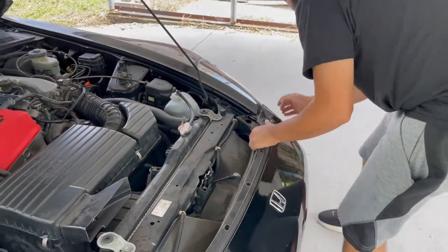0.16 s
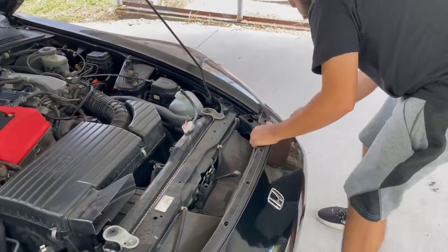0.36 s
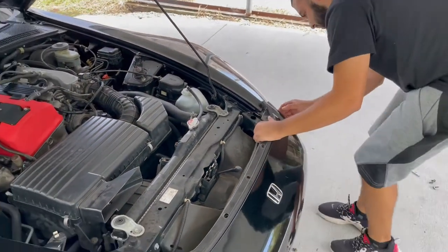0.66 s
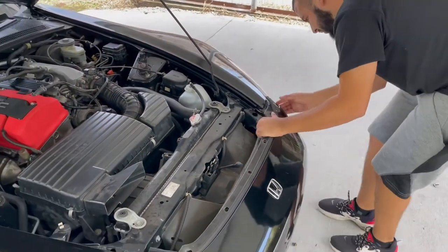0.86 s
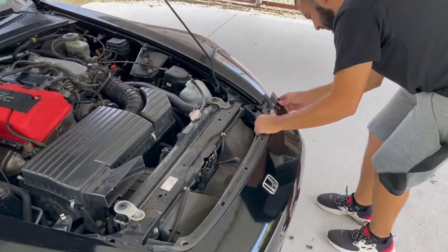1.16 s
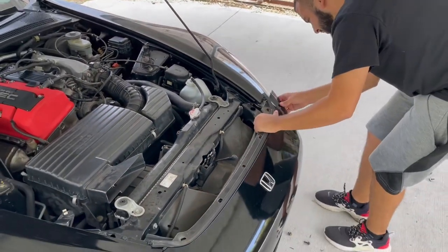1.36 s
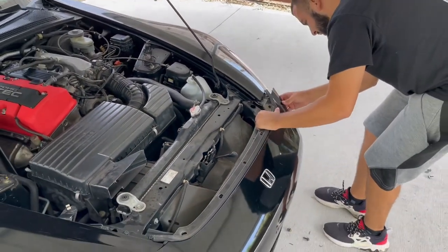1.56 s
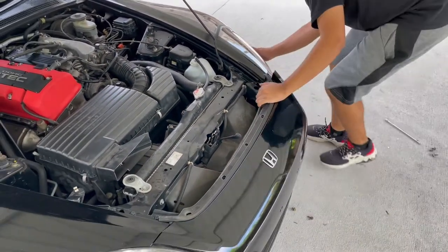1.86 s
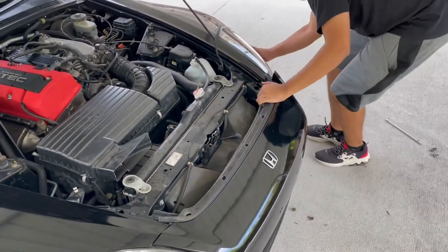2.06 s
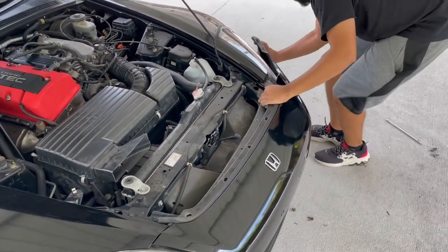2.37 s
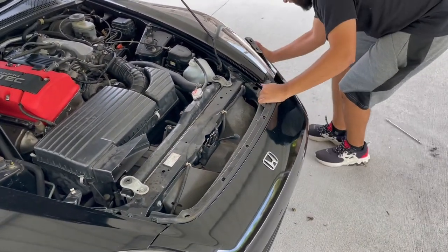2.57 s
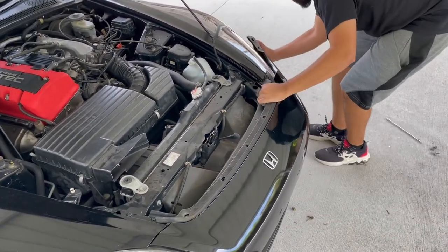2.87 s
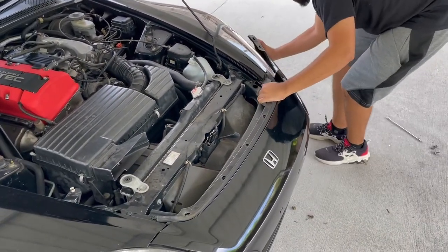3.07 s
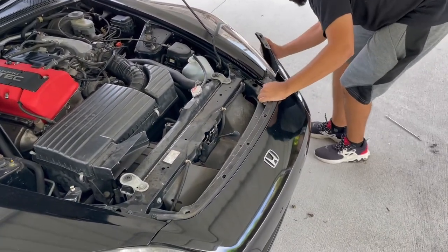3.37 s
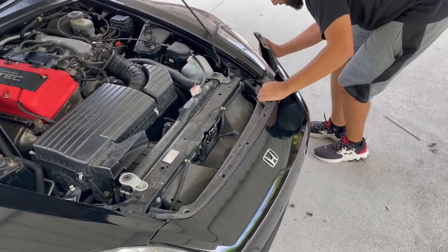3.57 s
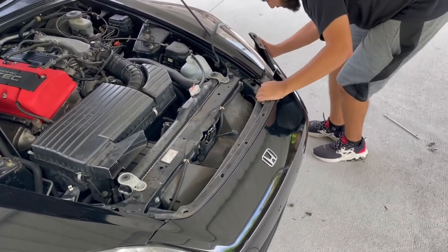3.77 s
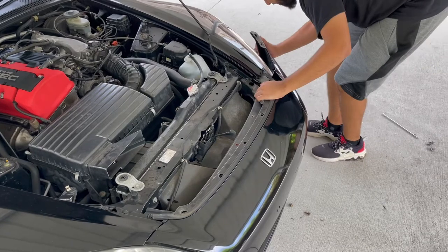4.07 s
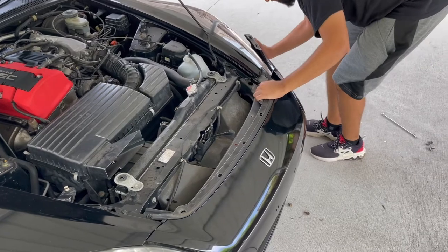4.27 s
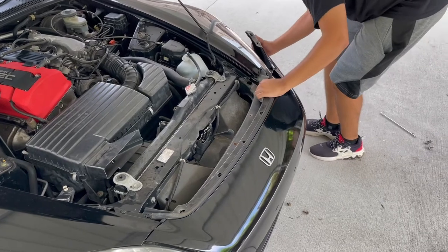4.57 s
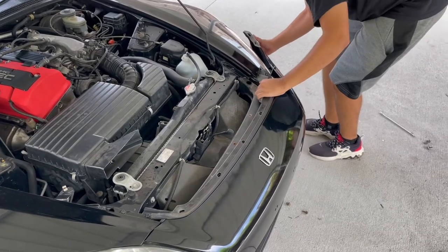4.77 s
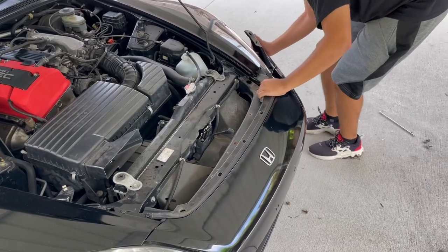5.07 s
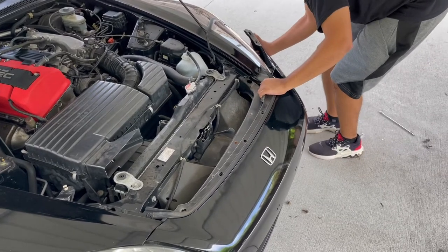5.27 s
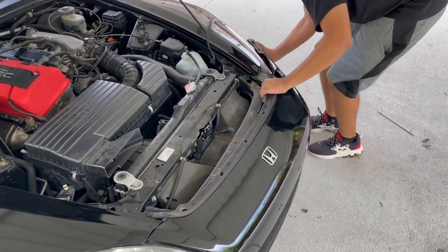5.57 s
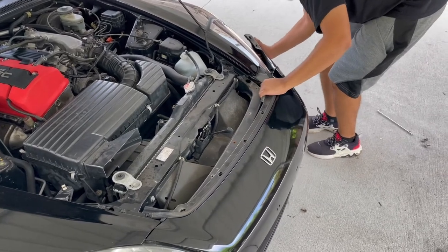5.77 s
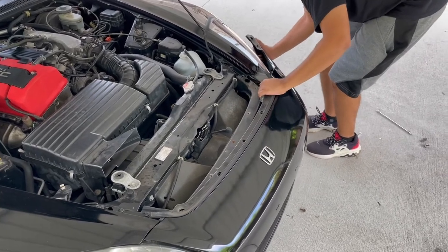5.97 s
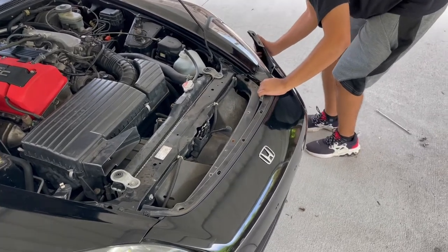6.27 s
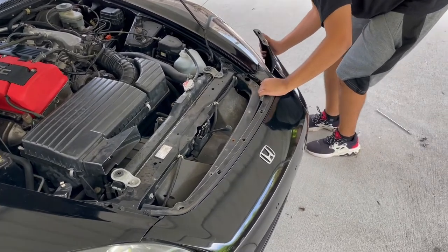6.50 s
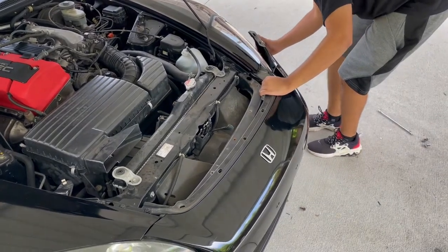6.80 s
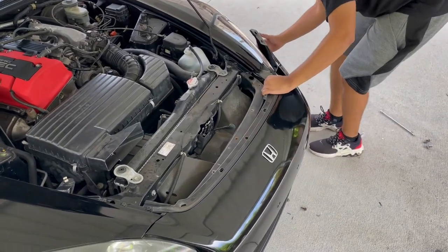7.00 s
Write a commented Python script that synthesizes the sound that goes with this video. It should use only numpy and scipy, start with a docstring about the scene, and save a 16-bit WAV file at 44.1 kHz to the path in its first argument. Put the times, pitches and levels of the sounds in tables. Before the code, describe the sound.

Plastic tabs break free from a car front: knocking at one second, hardest just before two, dull snaps soon after. A hollow housing knock follows, then a quieter stretch with small clicks and faint hand rubbing. Around five and a half seconds the panel pops and slaps again. Distant engines hum beneath. Close microphone, concrete floor, short garage tail.

```python
"""The mouth of a garage: close by, a plastic bumper cover is pulled off a car by hand.
Tabs snap out of their clips, struck as short resonances; the panel answers with noise bands and ringing modes.
Edges tick and scrape, clips click, the panel slaps, a housing knocks hollow, a metal fitting squeaks.
Hands rub and slide as shaped noise. The floor sends blows back and the garage adds a short tail.
Outside, far off: filtered noise for traffic, gliding tones for engines, and a bird of a few harmonics."""
import sys
import numpy as np
from scipy import signal
from scipy.io import wavfile

SR = 44100
rng = np.random.default_rng(int(sys.argv[2]) if len(sys.argv) > 2 else 0)


def transcribe(signal):
    """Save signal, clipped to [-1, 1], as a 16-bit WAV file at the path in sys.argv[1]."""
    frames = np.atleast_2d(signal).T
    limited = np.clip(frames, -1, 1)
    pcm = np.round(limited * 32767).astype(np.int16)
    wavfile.write(sys.argv[1], SR, pcm)


N = 314874
TIME = np.arange(N) / SR
BAND_EDGES_HZ = 22 * 2 ** np.arange(0, 9.7, .4)

# tabs letting go; heft is how much the whole panel moves, sharpness how hard the tab cracks:
# start_s, strength_db, heft_db, sharpness_db, tab_ring_db, tab_pitch_hz
SNAPS = [(1.0201, -15.5, 3, -7, -22, 1784), (1.038, -17.5, 5, -8, -30.5, 1690),
         (1.9489, -9.5, 0, 5.5, -17.5, 1780), (2.336, -12.5, 2, -21, -37, 1750),
         (2.355, -11.5, -3, -12.5, -30, 1750), (2.4218, -26, -10, 6.5, -35, 1864),
         (5.5016, -23.5, 9.5, -4, -35, 1720), (5.529, -22.5, 3.5, -28, -28, 1780),
         (5.696, -20.5, -0.5, -14, -44, 1750)]
# ringing of a tab: multiple_of_pitch, level_db, t60_s
TAB_MODES = [(1, -1.5, 0.031), (1.32, -11, 0.027), (1.609, -5, 0.032), (1.97, -8, 0.042),
             (3.88, -9.5, 0.025)]
# the loose panel slaps the body, each time with another patch: start_s, level_db, pitch_hz
SLAPS = [(1.024, -15, 365), (1.955, -8.5, 496), (1.9718, -10, 225), (5.503, -22, 427), (5.527, -10.5, 600)]
# the freed panel bumps on its mounts: start_s, level_db
BUMPS = [(1.683, -21), (2.056, -14.5), (2.107, -17), (2.231, -22), (2.292, -17.5)]
# light contacts of the edges: start_s, strength_db, brightness_db_per_octave
TICKS = [(0.5563, -50.5, 2.5), (0.694, -51, 5), (0.959, -41.5, -2), (1.226, -45, -7), (2.4483, -34.5, -7),
         (2.603, -39, -5.5), (2.755, -40, -5.5), (2.836, -43.5, -10), (3.021, -45.5, -8), (4.209, -45, -1),
         (5.693, -41.5, -6)]
# an edge scrapes over its catch: start_s, strength_db, brightness_db_per_octave
SCRAPES = [(1.014, -33, -1), (2.336, -30, -5.5), (2.425, -38.5, -5.5), (5.522, -31.5, -3.5),
           (5.9, -60.5, 5)]
# small clips click open: start_s, strength_db, brightness_db_per_octave, ring_db, ring_pitch_hz
CLICKS = [(0.1742, -46, -6, -52, 3210), (1.4664, -47, 2, -46.5, 3390), (3.3424, -35, -4, -40, 2017),
          (4.2331, -32, -4.5, -38, 2030)]
# the dry crack of a clip: pitch_hz, level_db, t60_s
CLIP_CRACK = [(1120, 2.5, 0.016), (2870, 0, 0.0062), (4470, 7, 0.0059), (13500, 12.5, 0.0064)]
# hollow knocks on the lamp housing: start_s, level_db
HOLLOW_KNOCKS = [(2.802, -19), (4.175, -39), (5.504, -23.5), (5.694, -24)]
# modes of the lamp housing: pitch_hz, level_db, t60_s
HOUSING_MODES = [(830, -1, 0.049), (983, -0.5, 0.045), (1218, 1, 0.027), (1430, -9.5, 0.051),
                 (1555, -3, 0.016)]
# a metal fitting squeaks twice: start_s, length_s, level_db, brightness_db_per_octave
SQUEAKS = [(5.695, 0.1, -51.5, -10), (5.873, 0.19, -62, 5.5)]
# partials of the squeak: pitch_hz, level_db, waver_share_of_pitch
METAL_PARTIALS = [(5255, 0, .004), (7550, -2, .003), (13280, 0, .02)]

# ringing of the panel and the car's front: pitch_hz, level_db, t60_s
PANEL_MODES = [(132.7, -6, 0.48), (224.7, 0, 0.24), (359.4, -8.5, 0.57), (466, 0, 0.096), (562, -8, 0.2),
               (832, -12, 0.3), (989, 1.5, 0.16), (1280, -6.5, 0.33), (1434, -8, 0.26), (1620, -11, 0.47),
               (1820, -9.5, 0.31), (2020, -9, 0.42), (2530, -9, 0.44), (3135, -21, 0.4), (3520, -12, 0.45)]
# colour of a blow on top of its own levels: frequency_hz, level_db
BLOW_COLOUR = [(40, -33), (70, -1.5), (125, 1), (220, -1), (310, -5), (500, -6.5), (760, -5), (1150, -4.5),
               (2500, -2.5), (3300, -6.5), (4700, -1), (6600, -6.5), (8500, 0.5), (11000, -3.5),
               (14000, 0.5)]
# dying of the panel's crowded modes, before each contact's damping: frequency_hz, t60_s
PANEL_T60 = [(100, 0.11), (400, 0.097), (1500, 0.11), (5000, 0.2), (14000, 0.1)]
# dying of the garage: frequency_hz, t60_s
GARAGE_T60 = [(100, 0.34), (500, 0.73), (1500, 0.58), (3000, 0.53), (5000, 0.32), (14000, 0.34)]
# left-right likeness of blows close by: frequency_hz, correlation
BLOW_LIKENESS = [(200, 1), (380, 0.79), (1300, 0.76), (2400, -0.31), (4400, 0.55), (6500, -0.67),
                 (8500, -0.97), (12000, 0.97)]

# hands slide over the plastic: middle_s, half_length_s, level_db, swish_centre_hz
SLIDES = [(2.25, 0.46, -52.5, 2000), (5.118, 0.14, -47.5, 1820), (5.416, 0.11, -45.5, 2390),
          (6.125, 0.18, -45.5, 2500), (7.1, 0.54, -51.5, 1530)]
# colour of the rubbing: frequency_hz, relative_db_per_hz
RUB_COLOUR = [(1100, 1.5), (1700, -0.5), (2800, -5), (4000, -12), (6500, -16.5), (10000, -35)]
# colour of the fine rustle: frequency_hz, relative_db_per_hz
RUSTLE_COLOUR = [(7500, 7.5), (10500, -7.5), (13800, -12), (16000, -8)]
# level of the street's rumble: time_s, level_db
TRAFFIC = [(0.0, -27), (0.59, -44), (1.05, -41), (1.17, -38.5), (2.07, -26), (3.74, -30), (6.66, -26.5),
           (7.14, -26.5)]
# colour of the rumble: frequency_hz, relative_db_per_hz
RUMBLE_COLOUR = [(20, -46), (40, -10), (62, 6), (100, -0.5), (135, -4.5), (170, -10), (260, -19),
                 (450, -24)]
# colour of the road wash: frequency_hz, relative_db_per_hz
WASH_COLOUR = [(170, -2.5), (300, -5.5), (560, -9.5), (1000, -7), (1600, -20), (3200, -32)]
# left-right likeness of the background: frequency_hz, correlation
AIR_LIKENESS = [(110, 0.95), (380, 0.68), (1300, -0.069), (6000, 0.32), (8300, -1.01), (11500, 1)]
# engines of far vehicles swell and fade: start_s, end_s, first_hz, last_hz, level_db
ENGINES = [(0.94, 1.78, 85, 84, -33.5), (2.599, 3.85, 178.9, 185.2, -39), (2.8, 4.332, 92.1, 89, -36.5),
           (4.206, 4.72, 224.6, 211, -43.5), (2.99, 4.102, 225, 226.4, -40),
           (4.9, 5.426, 185.6, 210, -39.5), (5.405, 6.406, 81.8, 83, -31.5),
           (6.002, 6.412, 133, 134.8, -30), (6.39, 7.63, 123, 123.4, -27)]
# how well an engine's overtones carry: frequency_hz, level_re_note_db
OVERTONES = [(300, -32), (440, -18.5), (560, -12.5)]
# a far bird repeats one arched note: start_s, length_s
BIRD_NOTES = [(0.03, 0.12), (0.195, 0.092), (0.29, 0.15), (0.406, 0.11), (0.553, 0.116), (0.7, 0.1)]
# overall gain, with one brief dip; the end values hold outside it: time_s, gain_db
LEVEL_DIP = [(.515, 1.5), (.521, -10), (.529, -10), (.536, 2)]

SNAP_ATTACK_S = .0004   # shortest time that a snap takes to spread through the panel
MODE_SCATTER_DB = 2.5   # how much a mode's strength varies from snap to snap
RATTLE_DB, RATTLE_PER_S = 2.5, 110   # loose parts rattle unevenly in each band
TICK_PIVOT_HZ = 4020   # brightness tilts a tick about this frequency
FLOOR_ECHO_S, FLOOR_ECHO_DB = .00546, -17.5
GRIP_DB, RUSTLE_DB = -51, -63   # rubbing of a resting grip, and the fine rustle at that grip
RUSTLE_FOLLOWS = 0.4   # share of a slide's swell in dB that the rustle follows
WASH_DB, WASH_RISE_DB_PER_S = -44, 0.9731   # level at the start; it rises as traffic draws nearer
BIRD_DB = -62
CUTOFF_HZ = 15700


def from_db(db):
    """Amplitude factor of a level in dB."""
    return 10 ** (np.asarray(db) / 20)


def rms_one(x):
    """Scales a signal to rms 1."""
    return x / np.sqrt(np.mean(x ** 2) + 1e-20)


def in_time(rows):
    """Each column of a curve at every sample."""
    s, *columns = np.transpose(rows)
    return [np.interp(TIME, s, column) for column in columns]


def at_hz(points, hz):
    """Reads a table on a log-frequency axis."""
    f, value = np.transpose(points)
    return np.interp(np.log(hz), np.log(f), value)


def dying(t, t60):
    """Exponential decay that falls 60 dB in t60 seconds."""
    return np.exp(-np.log(1000) * t / t60)


def add(track, s, sound):
    """Mixes a sound into a track at time s."""
    start = max(round(s * SR), 0)
    track[..., start:start + sound.shape[-1]] += sound[..., :N - start]


def drift(rate):
    """Smooth chance from knots of spread 1, changing about rate times a second."""
    knots = rng.standard_normal(size=4096)
    return np.interp(TIME * rate, np.arange(len(knots)), knots)


def ring(force, hz, t60):
    """A two-pole resonance: a unit click sets a dying sine of starting height 1 ringing."""
    r, w = dying(1 / SR, t60), 2 * np.pi * hz / SR
    return signal.lfilter([0, np.sin(w)], [1, -2 * r * np.cos(w), r * r], force + 1e-18)


def tap(tail_db=-31.0, tail_t60=0.4):
    """The force of one sharp contact, followed by scattered reflections."""
    force = from_db(tail_db) * rng.standard_normal(SR) * dying(TIME[:SR], tail_t60)
    force[0] = 1
    return force


def noise_bands(likeness):
    """Yields (centre Hz, stereo noise of rms 1) band by band, with a set left-right correlation."""
    white = rng.standard_normal((2, 2, N))
    for k, (low, high) in enumerate(zip(BAND_EDGES_HZ, BAND_EDGES_HZ[1:])):
        band = signal.butter(2, [low, high], "band", fs=SR, output="sos")
        mid, side = signal.sosfilt(band, white[k % 2])
        hz = np.sqrt(low * high)
        alike = np.clip(at_hz(likeness, hz), -.99, .99)
        stereo = np.sqrt(1 + alike) * mid + np.sqrt(1 - alike) * side * [[1], [-1]]
        yield hz, rms_one(stereo)


def snap_level(snap, hz, crack_db=-9.0, edge_db=-5.0, fizz_db=-47.5,
               hollow_db=0.03, hollow_per_sharpness=0.31):
    """How hard a snap drives the panel at one frequency: heft feeds the bass, a blunt snap knocks more."""
    s, strength, heft, sharpness, *_ = snap
    hollow = hollow_db - hollow_per_sharpness * sharpness   # knock gained at the cost of clack
    spectrum = [
        (160, strength + heft),
        (470, strength + hollow),
        (1350, strength - hollow),
        (1900, strength - hollow + edge_db),
        (3000, strength + sharpness + crack_db),
        (12000, fizz_db),   # the same for every snap
    ]
    return at_hz(spectrum, hz)


def tick_level(tick, hz, lowest_hz=1400, rolloff_db=2.0):
    """A tick's spectrum is a straight slope that falls away below the edge's lowest resonance."""
    s, strength, brightness = tick
    tilt = brightness * np.log2(max(hz, lowest_hz) / TICK_PIVOT_HZ)
    return strength + tilt - rolloff_db * max(np.log2(lowest_hz / hz), 0)


def blow_power(hz, level_db, damping, room_db, build_s=SNAP_ATTACK_S, swell_cycles=2.1, room_onset_s=0.014):
    """Power of one band after a blow: long bending waves swell late, the panel dies fast, the garage slowly."""
    t = TIME[:SR * 3 // 4]
    swell = 1 - np.exp(-t / (build_s + swell_cycles / hz))
    panel = dying(t, at_hz(PANEL_T60, hz) / damping)
    room = from_db(room_db) * (1 - np.exp(-t / room_onset_s)) * dying(t, at_hz(GARAGE_T60, hz))
    return (from_db(level_db) * swell) ** 2 * (panel ** 2 + room ** 2)


def clatter(snap_db=-3.5, tick_db=-4.0, click_db=-4.0):
    """Snaps and light contacts excite the panel's crowded modes, too dense to be heard one by one."""
    out = np.zeros((2, N))
    chatter = from_db(2.2 * drift(500))   # loose edges buzz against each other
    for hz, modes in noise_bands(BLOW_LIKENESS):
        power = np.zeros(N)
        for snap in SNAPS:
            level = snap_level(snap, hz) + snap_db
            add(power, snap[0], blow_power(hz, level, damping=0.71, room_db=-9.5))
        if hz > 500:   # light contacts are too weak to move the whole panel
            for tick in TICKS:
                level = tick_level(tick, hz) + tick_db
                add(power, tick[0], blow_power(hz, level, damping=0.93, room_db=-9.0))
            for *click, _, _ in CLICKS:
                level = tick_level(click, hz) + click_db
                add(power, click[0], blow_power(hz, level, damping=1.17, room_db=-13.5))
            for scrape in SCRAPES:
                level = tick_level(scrape, hz)
                add(power, scrape[0], blow_power(hz, level, damping=0.68, room_db=-8.0, build_s=0.001))
            modes = modes * chatter * from_db(RATTLE_DB * drift(RATTLE_PER_S))
        out += from_db(at_hz(BLOW_COLOUR, hz)) * np.sqrt(power) * modes
    return out


def cracks(snap_db=-11.5, fizz_db=13.0):
    """The plastic around a released tab knocks in short resonances; a light contact starts with a fine tick."""
    snaps, ticks = np.zeros((2, N))
    for snap in SNAPS:
        add(snaps, snap[0], from_db([snap_level(snap, 1600) + snap_db]))
    for tick in TICKS:
        add(ticks, tick[0], from_db([tick_level(tick, 15000) + fizz_db]))
    knock = ring(snaps, 1200, 0.023) - ring(snaps, 2470, 0.0084) + 1.9 * ring(snaps, 575, 0.052)
    return knock + ring(ticks, 13200, 0.004)


def tabs():
    """Each tab twangs at a pitch of its own as it springs free."""
    out = np.zeros((2, N))
    for s, *_, level_db, hz in SNAPS:
        # separate reflections on left and right
        force = from_db(level_db) * np.array([tap(tail_db=-22.5, tail_t60=0.23) for side in range(2)])
        twang = sum(from_db(mode_db) * ring(force, hz * multiple, t60) for multiple, mode_db, t60 in TAB_MODES)
        add(out, s, twang)
    return out


def panel_modes(ring_db=-9.0):
    """The strongest modes stand out; each snap strikes them with strengths of its own."""
    out = np.zeros((2, N))
    for hz, mode_db, t60 in PANEL_MODES:
        strikes = np.zeros(N)
        for snap, luck in zip(SNAPS, rng.standard_normal((len(SNAPS), 2))):
            level = snap_level(snap, hz) + mode_db + ring_db + MODE_SCATTER_DB * luck[1]
            add(strikes, snap[0], np.sign(luck[:1]) * from_db(level))
        balance_db = 2 * rng.standard_normal() * np.array([[1], [-1]])   # left against right
        out += ring(strikes, hz, t60) * from_db(balance_db)
    return out


def slaps(swell_cycles=1.0):
    """A broad, blunt contact: one patch of the panel swings up and dies within a few cycles."""
    out = np.zeros(N)
    for s, level_db, hz in SLAPS:
        cycles = hz * TIME[:SR // 10]
        age = cycles / swell_cycles
        add(out, s, from_db(level_db) * age * np.exp(1 - age) * np.sin(2 * np.pi * cycles))
    return out


def bumps(t60=0.095):
    """Soft contacts move only two low modes of the hanging panel."""
    pushes = np.zeros(N)
    for s, level_db in BUMPS:
        add(pushes, s, from_db([level_db]))
    return ring(pushes, 67, t60) - ring(pushes, 130, t60)


def hollow_knocks():
    """Sharp taps on the housing; scattered reflections keep its modes going for a moment."""
    force = np.zeros(N)
    for s, level_db in HOLLOW_KNOCKS:
        add(force, s, from_db(level_db) * tap())
    out = np.zeros(N)
    for k, (hz, level_db, t60) in enumerate(HOUSING_MODES):
        out += (-1) ** k * from_db(level_db) * ring(force, hz, t60)   # neighbours swing in opposite phase
    return out


def clicks(ring_cycles=490.0):
    """A clip opens with one dry crack, then rings on thinly at its own pitch."""
    out, force = np.zeros(N), signal.unit_impulse(SR)
    for *click, ring_db, ring_hz in CLICKS:
        crack = sum(from_db(tick_level(click, hz) + mode_db) * ring(force, hz, t60)
                    for hz, mode_db, t60 in CLIP_CRACK)
        thin_ring = from_db(ring_db) * ring(force, ring_hz, ring_cycles / ring_hz)
        add(out, click[0], crack + thin_ring)
    return out


def squeaks(rough_db=1.0):
    """A rubbed metal fitting sings in a short, uneven swell: two narrow partials and a hissy top one."""
    out = np.zeros(N)
    for hz, partial_db, waver in METAL_PARTIALS:
        phase = 2 * np.pi * np.cumsum(hz * (1 + waver * drift(300))) / SR
        tone = np.sin(phase) * from_db(rough_db * drift(110))
        for start, length, level_db, brightness in SQUEAKS:
            along = np.clip((TIME - start) / length, 0, 1)
            tilt_db = brightness * np.log2(hz / METAL_PARTIALS[0][0])
            out += from_db(level_db + partial_db + tilt_db) * np.sin(np.pi * along) * tone
    return out


def floor_echo(x):
    """The concrete floor sends each blow back a moment later, which makes it hollow."""
    late = np.array([np.interp(TIME - FLOOR_ECHO_S, TIME, side, left=0) for side in x])
    return x + from_db(FLOOR_ECHO_DB) * late


def swishes(swish_db=-4.5, width=0.38):
    """A sliding hand stirs a broad resonance of the plastic, at a pitch that depends on where it rubs."""
    out = np.zeros((2, N))
    for s, half_s, level_db, hz in SLIDES:
        edges = [hz / (1 + width / 2), hz * (1 + width / 2)]
        band = signal.butter(2, edges, "band", fs=SR, output="sos")
        friction = rms_one(signal.sosfilt(band, rng.standard_normal((2, N))))
        swell = np.exp(-.5 * ((TIME - s) / half_s) ** 2)
        out += from_db(level_db + swish_db) * swell * friction
    return out


def rubbing_db():
    """Level of the rubbing: a steady grip, and a bell-shaped swell of power for each slide."""
    slides = sum(from_db(level_db) ** 2 * np.exp(-((TIME - s) / half_s) ** 2)
                 for s, half_s, level_db, _ in SLIDES)
    return 10 * np.log10(from_db(GRIP_DB) ** 2 + slides)


def background(rumble_db=-0.9, flicker_db=1.17, grain_db=0.5):
    """Traffic rumble and road wash, with the grainy rubbing of hands and plastic above, as noise bands."""
    rumble, = in_time(TRAFFIC)
    wash = WASH_DB + WASH_RISE_DB_PER_S * TIME
    rub, grain = rubbing_db(), grain_db * drift(160)
    rustle = RUSTLE_DB + RUSTLE_FOLLOWS * (rub - GRIP_DB)
    powers = from_db([rumble + rumble_db, wash, rub + grain, rustle + grain]) ** 2

    # each layer's power is shared out among the bands inside its table
    centres = np.sqrt(BAND_EDGES_HZ[1:] * BAND_EDGES_HZ[:-1])
    shares = []
    for colour in (RUMBLE_COLOUR, WASH_COLOUR, RUB_COLOUR, RUSTLE_COLOUR):
        inside = (centres > colour[0][0]) * (centres < colour[-1][0])
        shares.append(from_db(at_hz(colour, centres)) ** 2 * centres * inside)
    shares = np.array(shares)
    shares = shares / shares.sum(axis=1, keepdims=True)

    out = np.zeros((2, N))
    for share, (hz, noise) in zip(shares.T, noise_bands(AIR_LIKENESS)):
        out += np.sqrt(share @ powers) * from_db(flicker_db * drift(9)) * noise
    return out


def engines(waver=0.00393, fading_db=0.5):
    """Each far engine is an exhaust note with two overtones that glides evenly while it swells and fades."""
    out = np.zeros(N)
    for start, end, first_hz, last_hz, level_db in ENGINES:
        along = np.clip((TIME - start) / (end - start), 0, 1)
        hz = first_hz + (last_hz - first_hz) * along
        phase = 2 * np.pi * np.cumsum(hz * (1 + waver * drift(12))) / SR
        overtones = sum(from_db(at_hz(OVERTONES, k * first_hz)) * np.sin(k * phase) for k in (2, 2.5))
        level = from_db(level_db + fading_db * drift(9.8)) * np.sqrt(2)   # rms to peak of a sine
        out += np.sin(np.pi * along) * level * (np.sin(phase) + overtones)
    return out


def bird(top_hz=1008, sag_hz_per_s=45, rise=0.0806, crest=.58):
    """A nasal note rises and droops, a little lower each time; only its upper harmonics carry over the traffic."""
    out = np.zeros(N)
    for start, length in BIRD_NOTES:
        along = np.linspace(0, 1, int(length * SR))
        hz = (top_hz - sag_hz_per_s * start) * (1 - 2 * rise * (along - crest) ** 2)
        phase = 2 * np.pi * np.cumsum(hz) / SR
        note = 1.3 * np.sin(2 * phase) + np.sin(3 * phase) + 0.9 * np.sin(4 * phase)
        swell = 2 * np.sqrt(along * (1 - along))
        add(out, start, from_db(BIRD_DB) * swell * note)
    return out * from_db(3.5 * drift(140))   # its level flickers


def scene():
    """The bumper close by, the street behind it."""
    blows = floor_echo(clatter() + cracks() + clicks())
    bumper = blows + tabs() + panel_modes() + slaps() + bumps() + hollow_knocks() + squeaks()
    street = engines() + bird()
    return bumper + swishes() + background() + street


def record(dry):
    """At the microphone the level dips once, the loudest peaks overload and the top is cut."""
    clipped = np.clip(dry * from_db(in_time(LEVEL_DIP)[0]), -.97, .97)
    low_pass = signal.ellip(10, .1, 80, CUTOFF_HZ, fs=SR, output="sos")
    return signal.sosfilt(low_pass, clipped)


dry = scene()
out = record(dry)
transcribe(out)
```